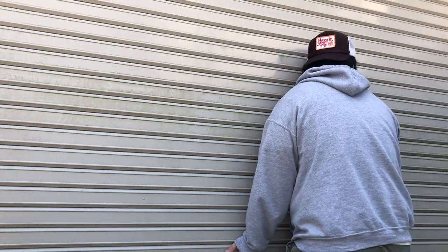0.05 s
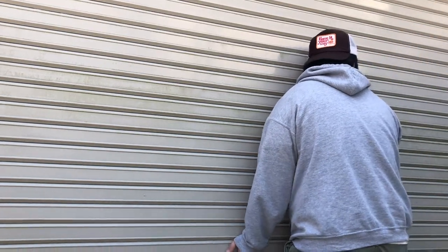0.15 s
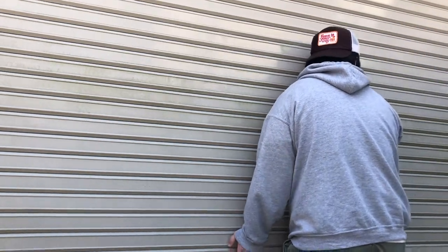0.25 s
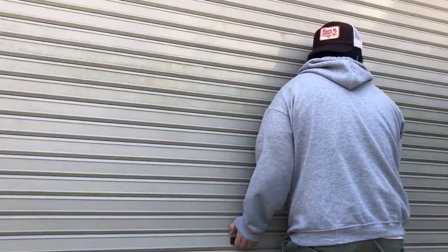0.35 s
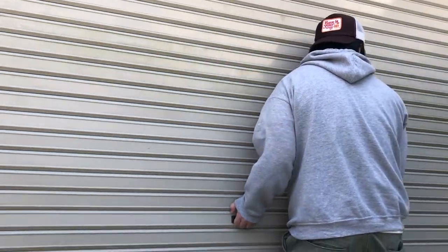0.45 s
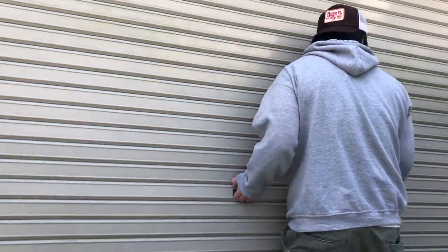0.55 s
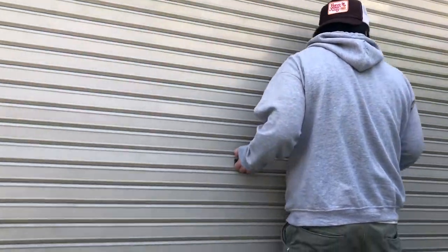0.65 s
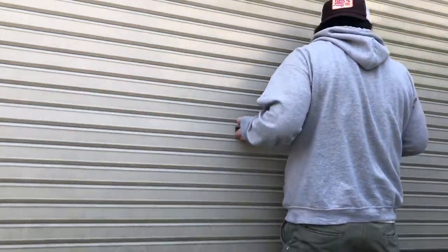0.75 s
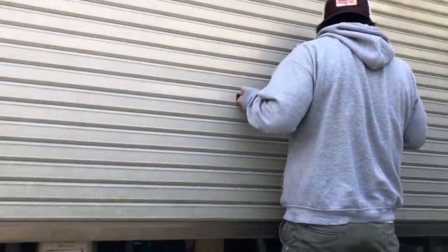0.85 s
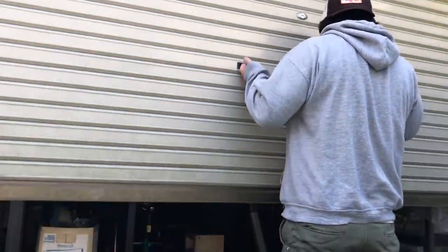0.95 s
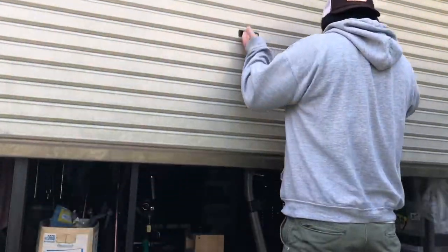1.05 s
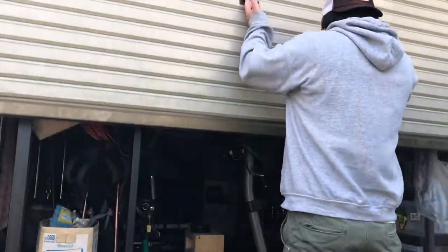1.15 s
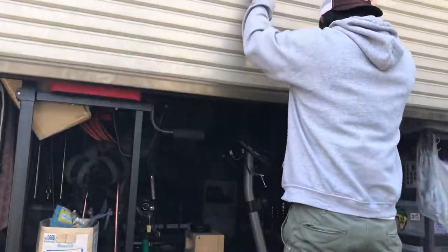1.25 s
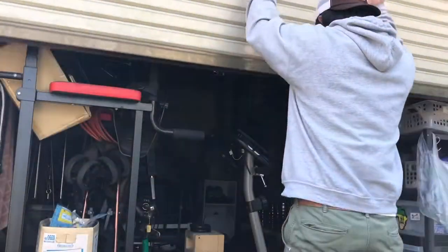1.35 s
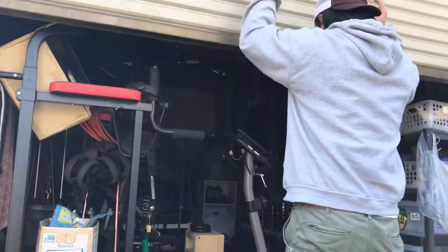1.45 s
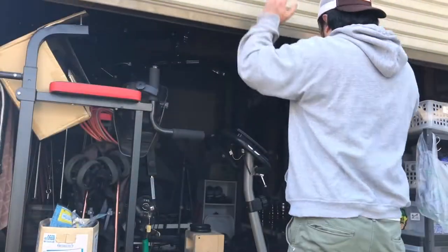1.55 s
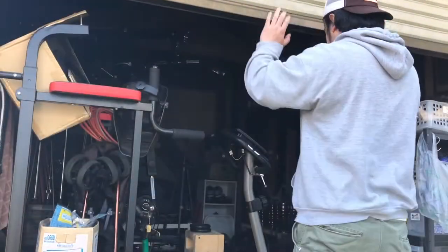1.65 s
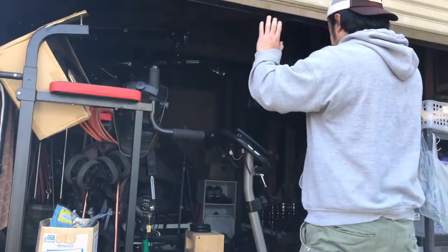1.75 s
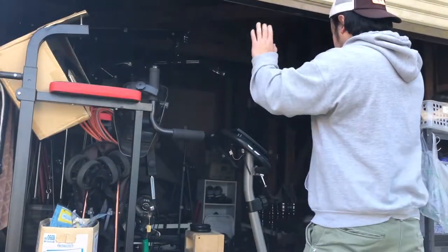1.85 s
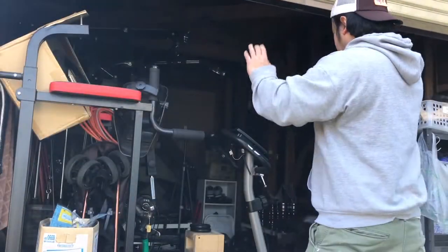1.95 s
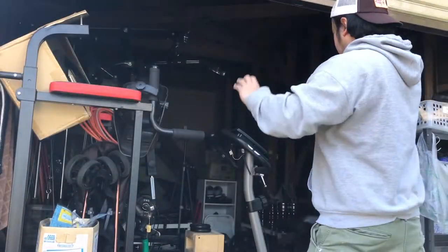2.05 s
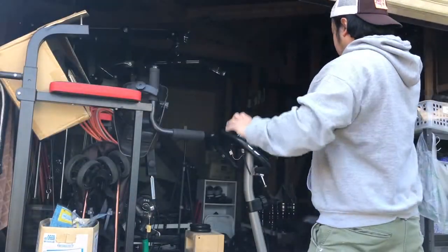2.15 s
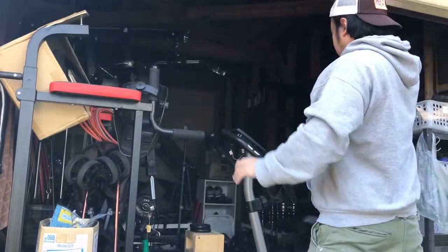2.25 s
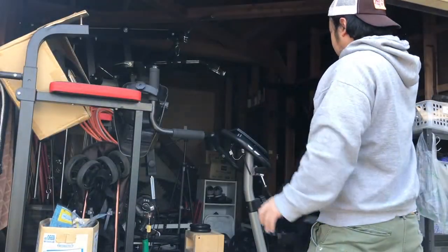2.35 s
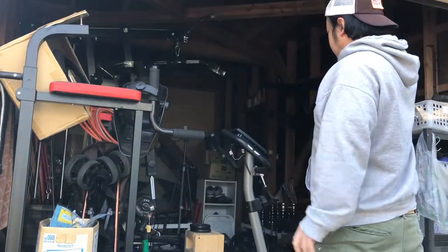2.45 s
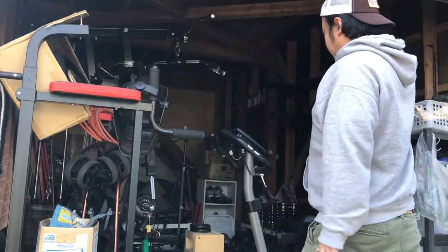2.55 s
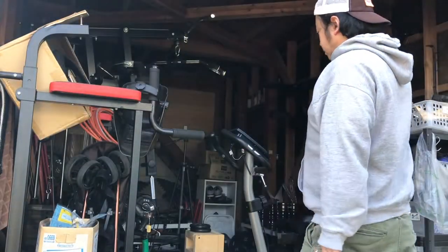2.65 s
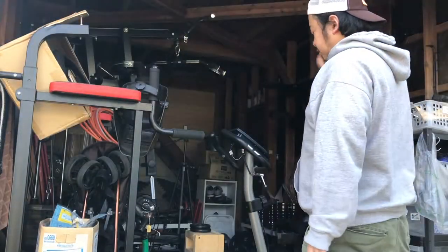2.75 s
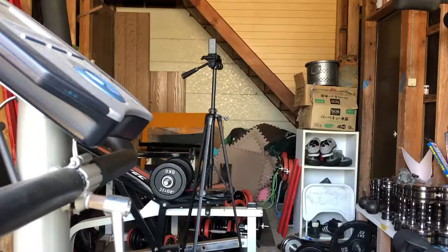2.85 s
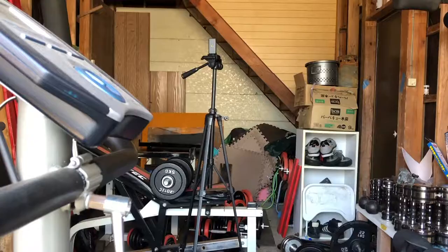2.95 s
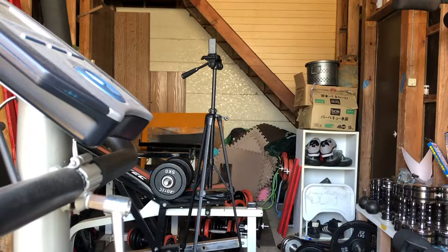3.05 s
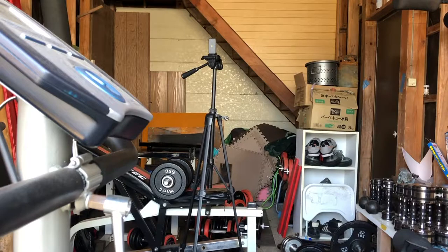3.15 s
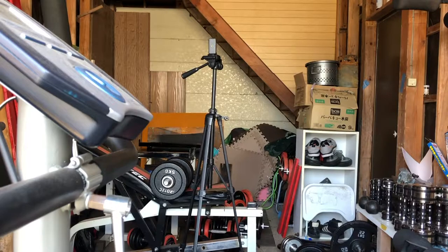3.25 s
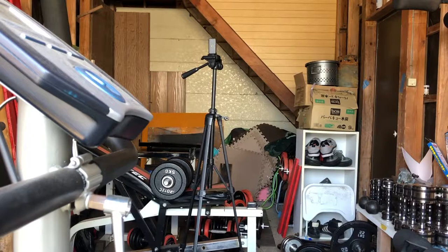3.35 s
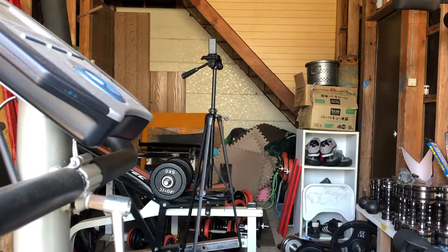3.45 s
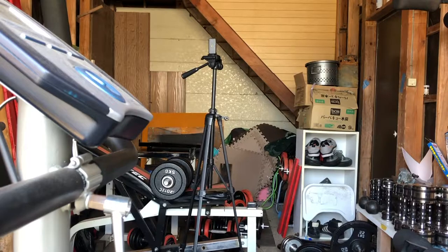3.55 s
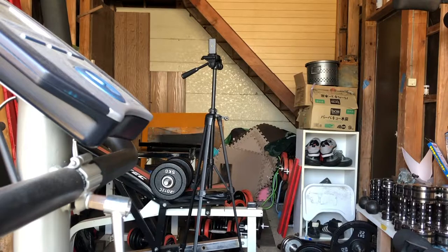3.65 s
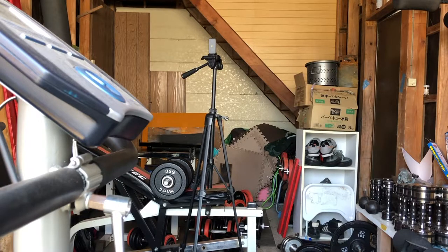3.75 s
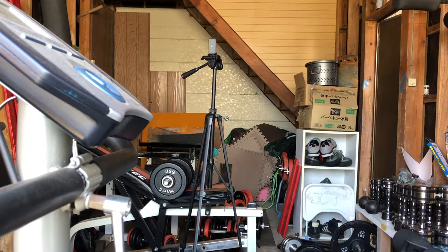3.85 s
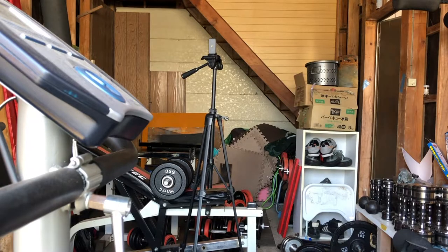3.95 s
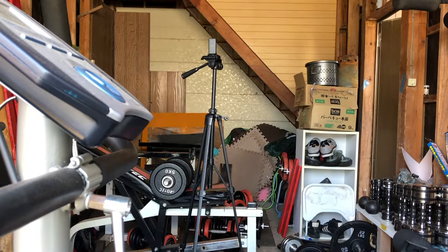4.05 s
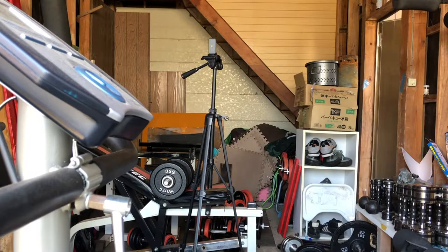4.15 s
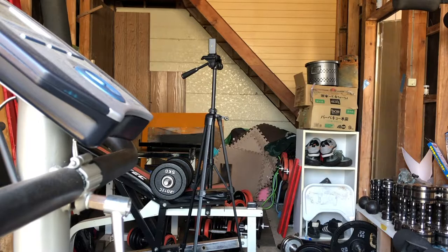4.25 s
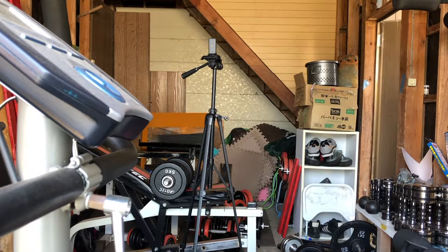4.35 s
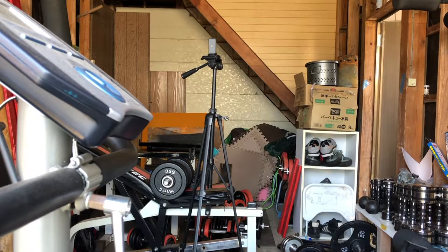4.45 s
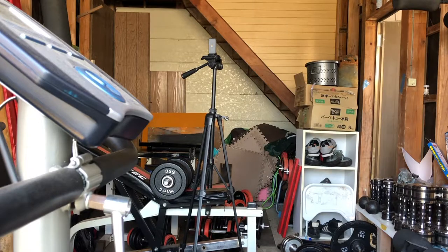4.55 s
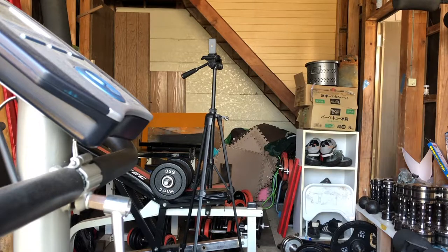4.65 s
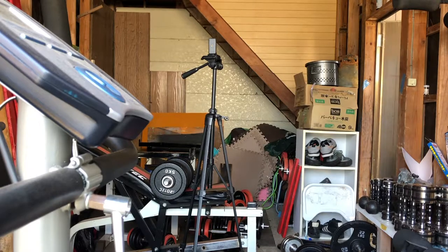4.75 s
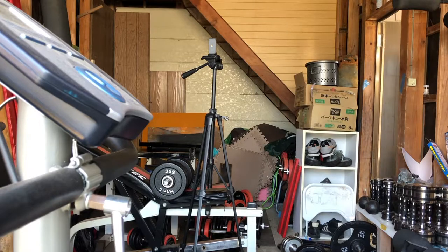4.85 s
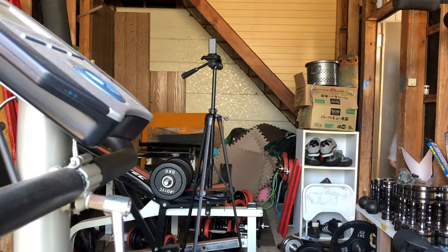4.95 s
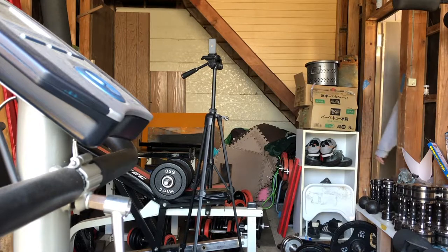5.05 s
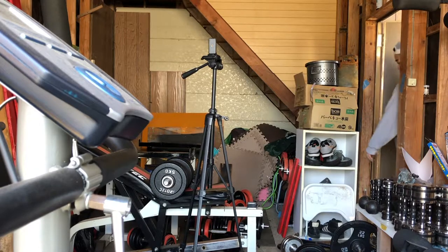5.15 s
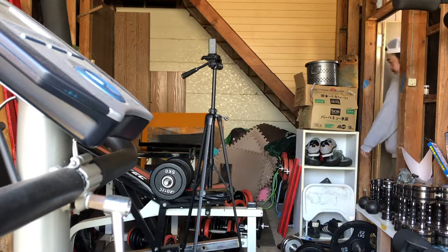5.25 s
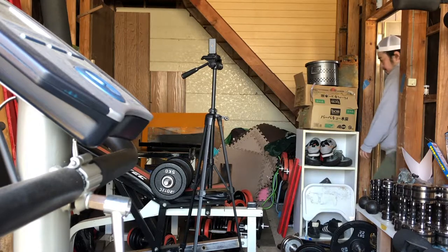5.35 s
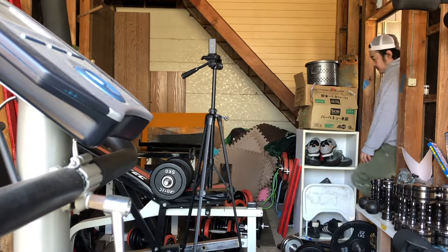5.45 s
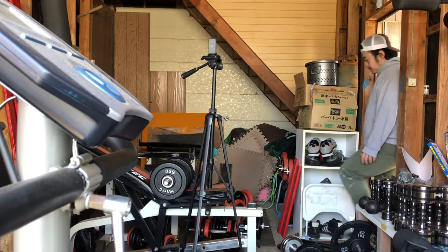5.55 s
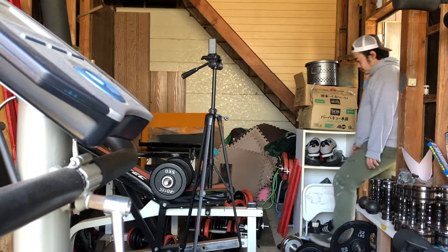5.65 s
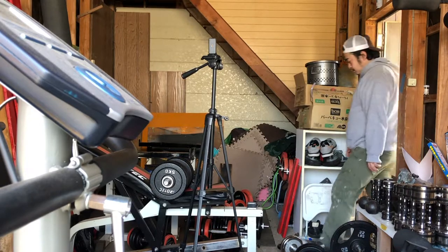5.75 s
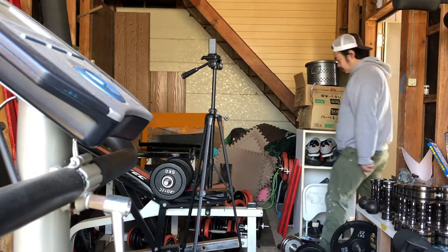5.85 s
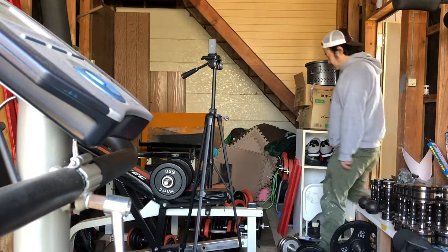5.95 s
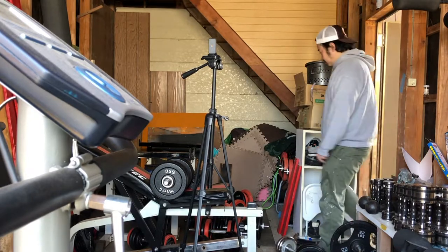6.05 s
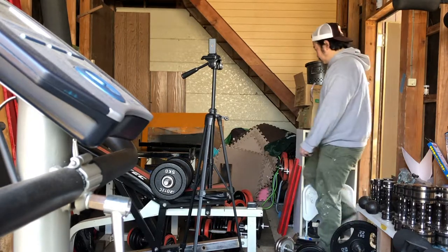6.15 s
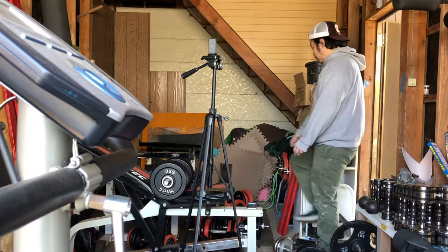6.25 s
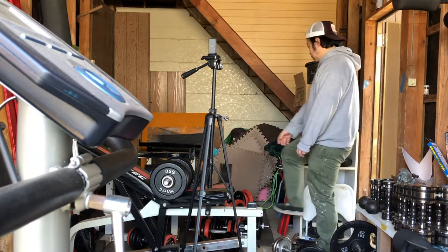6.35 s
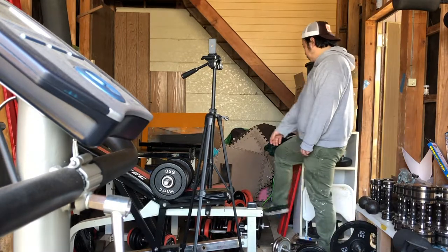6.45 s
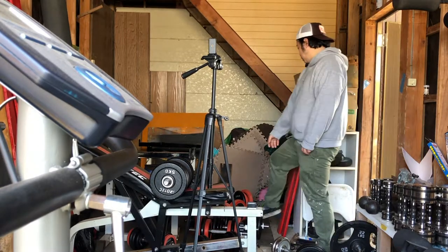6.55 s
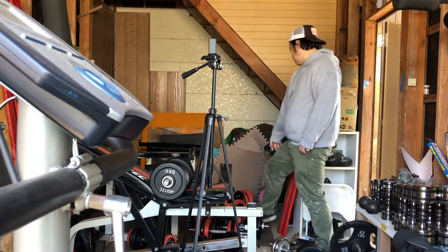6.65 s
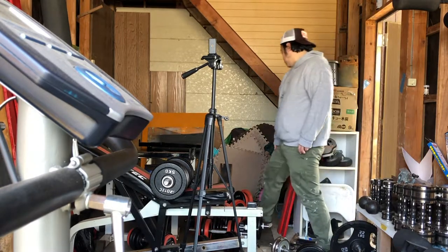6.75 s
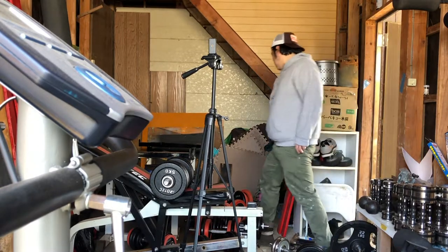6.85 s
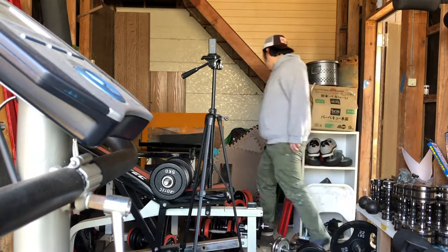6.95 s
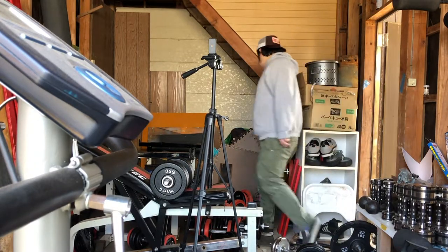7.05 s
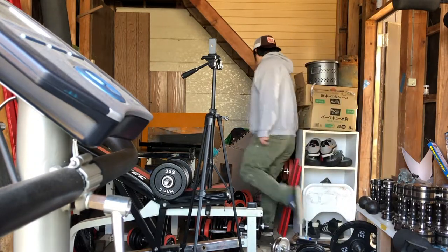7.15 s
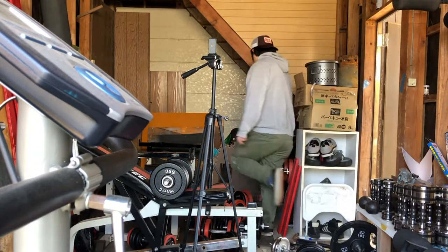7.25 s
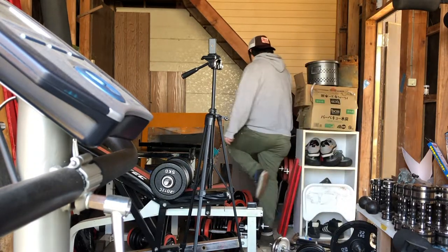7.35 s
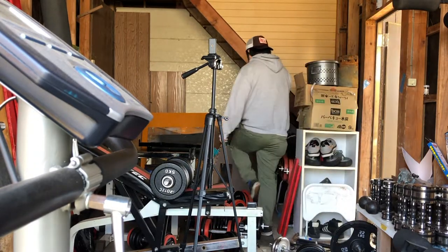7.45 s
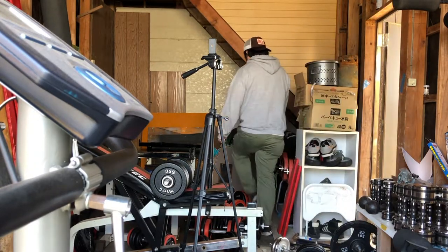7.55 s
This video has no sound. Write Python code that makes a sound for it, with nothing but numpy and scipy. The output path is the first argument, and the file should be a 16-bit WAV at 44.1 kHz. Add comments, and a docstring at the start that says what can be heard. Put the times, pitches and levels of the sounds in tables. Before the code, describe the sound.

A loud, harsh metallic rattle surges as a roller shutter goes up by hand, its slats banging in the rails right before a phone-like microphone. Suddenly everything is quiet inside a small garage. A sliding door hums along its track twice, with wooden creaks and latch ticks; a hoarse bird slides downward in pitch outside. Someone steps in, knocking and clinking iron weights, shoes scuff, and low thumps finish close by.

```python
"""Outside, close in front: a steel roller shutter is thrown up by hand. Its slats clatter in their rails and
slam as bursts of decaying noise and modes, the curtain booms, and gliding tones squeal.
Then the place changes abruptly to inside the garage, with quiet air, a low hum, knocks, ticks and steps.
A bird slides down in pitch outside, a door rolls open and shut on humming rollers, and wood creaks.
A man steps in over clinking iron weights, rung as beating modes, and soft sagging tones bump close by."""
import sys
import numpy as np
from scipy import signal
from scipy.fft import rfft, irfft, next_fast_len
from scipy.io import wavfile
from scipy.ndimage import uniform_filter1d

SR = 44100
rng = np.random.default_rng(int(sys.argv[2]) if len(sys.argv) > 2 else 0)


def inscribe(sig):
    """Save sig as 16-bit PCM at rate SR to the path in sys.argv[1].

    A 1-D sig is mono; a 2-D sig holds one channel per row.
    Samples are clipped to [-1, 1] before scaling.
    """
    pcm = np.round(np.clip(np.atleast_2d(sig).T, -1, 1) * 32767)
    wavfile.write(sys.argv[1], SR, pcm.astype(np.int16))


N = 335553
T = np.arange(N) / SR
CUT_S = 2.852  # from outside to inside

# All dB columns are relative levels, trimmed where they are used.
# slats slamming against rail and drum: start_s, body_db, edge_db, tick_db, resonance_hz
SLAMS = [(0.14, -15, -29, -21, 880), (0.303, -5.5, -18.5, -20, 1310), (0.407, -12, -17, -14, 860),
         (0.487, -17, -16, -16, 1070), (0.553, -16, -15, -15, 1440), (0.605, -11, -17, -32, 1040),
         (0.656, -6, -14, -32, 1010), (0.717, -17, -15.5, -27, 991), (0.769, -8.5, -14, -15, 920),
         (0.82, -12, -21.5, -41, 1220), (0.871, -3.5, -21, -39, 705), (0.9, -12, -16, -33, 1110),
         (0.95, -5.5, -24, -26, 1570), (0.979, -17, -17.5, -27, 1030), (1.153, -3, -14, -24, 750),
         (1.254, -4, -28, -30, 1000), (1.302, -6, -18, -20, 980), (1.351, -7.5, -19.5, -28, 910),
         (1.383, -5.5, -30, -36, 760), (1.49, -8, -28, -37, 990), (1.502, -6.5, -17, -26, 815),
         (1.694, -9, -29.5, -38, 1260), (1.748, -9, -33, -21, 1020), (1.878, -9.5, -26.5, -35, 1010),
         (1.945, -8.5, -18.5, -19, 1110), (2.116, -19, -41, -20, 1220), (2.175, -17, -26, -16.5, 736),
         (2.212, -14, -25, -32, 595), (2.33, -13, -22, -30, 1280), (2.385, -10.5, -30, -36, 587),
         (2.491, -14, -48, -39, 1020), (2.528, -11.5, -39, -25, 620), (2.652, -11, -21.5, -44, 1130),
         (2.704, -11.5, -23, -31, 895), (2.843, -13, -36, -30, 1130)]
# outline of a small metallic tick: frequency_hz, level_db
TICK_OUTLINE = [(3000, -9.5), (6000, 4.5), (11000, -1.5), (13000, -5), (16000, -12.5)]


def undb(db):
    """Decibels to gain."""
    return 10 ** (np.asarray(db) / 20)


def unit(x):
    """Scale to rms 1."""
    return x / np.sqrt(np.mean(x ** 2) + 1e-20)


def curve(rows):
    """Every column of a table, joined by straight lines in time."""
    s, *columns = np.transpose(rows)
    return [np.interp(T, s, c) for c in columns]


def add(out, s, x):
    """Mix x into out from time s on."""
    i = max(int(s * SR), 0)
    out[i:i + len(x)] += x[:max(N - i, 0)]


def colour(x, points):
    """Causal filter with the given (Hz, dB) outline and unit power gain."""
    size = 2 * next_fast_len(len(x) // 2 + 2048)
    hz, db = np.transpose(points)
    f = np.log(np.maximum(np.fft.rfftfreq(size, 1 / SR), 1))
    # beyond the outline the gain falls steeply
    outside = np.maximum(np.log(hz[0]) - f, 0) + np.maximum(f - np.log(hz[-1]), 0)
    gain = unit(undb(np.interp(f, np.log(hz), db) - 40 * outside))
    # folding the cepstrum forward gives minimum phase
    cepstrum = irfft(np.log(gain + 1e-6))
    cepstrum[1:size // 2] *= 2
    cepstrum[size // 2 + 1:] = 0
    response = np.exp(rfft(cepstrum))
    return irfft(rfft(x, size) * response, size)[:len(x)]


def favour(f, hz, octaves):
    """A soft bump around hz on the octave scale, height 1."""
    return 1 / (1 + (np.log2(f / hz) / octaves) ** 2)


def peaked(points, hz, lift_db):
    """An outline with one resonance raised."""
    centres, db = np.transpose(points)
    f = np.geomspace(centres[0], centres[-1], 120)
    base_db = np.interp(np.log(f), np.log(centres), db)
    return np.transpose([f, base_db + lift_db * favour(f, hz, octaves=0.22)])


def fade(t, t60):
    """Free decay, 60 dB down after t60."""
    return np.exp(-np.log(1000) * t / t60)


def burst(t60, tail_db, tail_t60):
    """Countless close modes struck at once: a quick crack over a longer ring."""
    t = T[:SR // 2]
    return rng.standard_normal(len(t)) * (fade(t, t60) + undb(tail_db) * fade(t, tail_t60))


def walk(rate):
    """Smooth chance with a spread near 1."""
    k = max(int(SR / rate), 2)
    steps = np.repeat(rng.standard_normal(N // k + 1), k)
    return unit(uniform_filter1d(uniform_filter1d(steps, k), k))[:N]


def swell(length):
    """A contact that builds quickly and lets go slowly."""
    u = np.linspace(0, 1, max(int(length * SR), 8))
    return np.sin(np.pi * u ** 0.53) ** 2


def slat_ring(t60=0.14, count=40):
    """Scattered bending modes of one steel slat; rms 1 at the strike."""
    t = T[:SR // 5]
    place, phase, life = rng.random((3, count, 1))
    hz = 700 * 14 ** place
    modes = np.sin(2 * np.pi * (hz * t + phase)) * fade(t, t60 * (.5 + life))
    return np.sum(modes, axis=0) * np.sqrt(2 / count)


def clatter(rate, spread_db, t60, tail_db, tail_t60, ring_db=-60, count=8):
    """Random impacts shared among several loose parts, each with its own ring; rms near 1."""
    out = 0
    for _ in range(count):
        struck = rng.random(N) < rate / count / SR
        hits = struck * undb(spread_db * np.clip(rng.standard_normal(N), -2, 1.5))
        part = burst(t60, tail_db, tail_t60)
        ring = slat_ring(count=16)
        part[:len(ring)] += undb(ring_db) * ring
        out = out + signal.oaconvolve(hits, part)[:N]
    # steady power, however it is shared among the impacts
    return out / np.sqrt(uniform_filter1d(out ** 2, SR // 16) + 1e-9)


def room(x, t60, wet_db):
    """Direct sound plus duller diffuse reflections, first arriving after 5 ms."""
    t = T[:SR]
    noise = rng.standard_normal(SR) * fade(t, t60) * (t > .005)
    tail = colour(noise, [(40, 4), (4000, -13.0), (16000, -13)])
    return x + undb(wet_db) * signal.oaconvolve(x, unit(tail) / np.sqrt(SR))[:N]


def binding(depth_db=1.0, hold=0.069):
    """The curtain catches and goes quieter just before each slat breaks loose."""
    until = np.array(SLAMS)[:, :1] - T[None, :int(CUT_S * SR)]
    caught = np.max((until > 0) * np.exp(-np.abs(until) / hold), axis=0)
    return undb(-depth_db * np.pad(caught, (0, N - len(caught))))


def shutter():
    """Hinged slats chatter, the sheet booms with speed, the edges grind in the rails, and single slats slam."""
    # travel of the curtain, thrown up, nearly stopping, then driven up again: time_s, speed_m_per_s
    lift = [(0, 0.6), (.3, 0.15), (.7, 0.27), (.93, 1.37), (1.38, 1.08), (1.6, 1.25), (2.0, 0.1),
            (2.35, 0.8), (2.85, 0.97)]
    # how hard the slats shake, surging as the drum turns: time_s, level_db
    shake = [(0, -33), (.07, -20), (.2, -28.5), (.45, -21.5), (.66, -16.5), (.83, -24), (.95, -17.5),
             (1.2, -19.5), (1.39, -15.5), (1.46, -23), (1.62, -23.5), (1.76, -19.5), (1.85, -28),
             (1.99, -18.5), (2.08, -28.5), (2.24, -22), (2.38, -20), (2.46, -32.5), (2.54, -22),
             (2.62, -26.5), (2.72, -19.5), (2.79, -26), (2.85, -21.5)]
    # outlines of curtain boom, slat rattle, rail scrape and slam edge: frequency_hz, level_db
    boom_outline = [(35, -12.5), (52, -0.5), (80, -4), (105, -3.5), (150, 3.5), (185, -0.5), (230, -3),
                    (320, -3.5), (400, -17), (520, -5.5), (620, -18)]
    rattle_outline = [(240, -11), (400, 3.5), (530, -9.5), (607, 3), (741, -5.5), (1000, -2), (1100, -3),
                      (1150, -2.5), (1230, -3.5), (1370, -4.5), (1650, -9), (2260, -10), (3500, -25),
                      (4550, -39), (7700, -120)]
    scrape_outline = [(1470, -22.5), (2500, 1.5), (2940, -2), (5390, -1.5), (9080, -9.5), (10100, -10),
                      (11700, -15.5), (13000, -18.5), (15200, -20), (16000, -32)]
    edge_outline = [(900, -29), (2000, 1), (4500, 1), (8000, -3.5), (11000, -9), (16000, -28.5)]
    ring_outline = [(600, -6.5), (1550, 5.5), (3000, -10.5), (10000, -11)]

    speed, = curve(lift)
    shake_db, = curve(shake)
    height = np.cumsum(speed) / SR  # metres
    flap_db = 5.5 * speed  # dB per m/s: a fast curtain flaps as a whole sheet
    thinning_db = -3.5 * height  # dB per metre: less edge is left in the rails as it rises

    rattle = clatter(rate=300, spread_db=2, t60=0.032, tail_db=-11.5, tail_t60=0.3055, ring_db=-4, count=20)
    boom = clatter(rate=200, spread_db=1.5, t60=0.0712, tail_db=-7.5, tail_t60=0.24)
    scrape = clatter(rate=340, spread_db=4.5, t60=0.01258, tail_db=-1.5, tail_t60=0.3252, ring_db=-5.0)
    # levels against the rattle, with the curtain at rest and down
    out = unit(colour(rattle, rattle_outline))
    out += undb(-8 + flap_db) * unit(colour(boom, boom_outline))
    out += undb(-4.5 + thinning_db) * unit(colour(scrape, scrape_outline))
    out *= undb(shake_db) * binding()

    for s, body_db, edge_db, tick_db, hz in SLAMS:
        low_db = body_db + flap_db[int(s * SR)]
        tick = colour(burst(t60=0.014, tail_db=-22, tail_t60=0.13), TICK_OUTLINE)
        edge = colour(burst(t60=0.085, tail_db=-9, tail_t60=0.3), edge_outline)
        body_outline = peaked(rattle_outline, hz, lift_db=11.5)
        body = colour(burst(t60=0.16, tail_db=-14.5, tail_t60=0.38), body_outline)
        ring = colour(slat_ring(t60=0.19, count=24), ring_outline)
        slam_boom = colour(burst(t60=0.24, tail_db=-14.5, tail_t60=0.39), boom_outline)
        add(out, s, undb(tick_db - 3) * tick)
        add(out, s, undb(edge_db - 1.5) * edge)
        add(out, s, undb(body_db - 12) * body)
        add(out, s, undb(body_db - 19) * ring)
        add(out, s, undb(low_db - 21) * slam_boom)

    # the deepest boom fades as the free sheet winds onto the drum, gone at 2.3 m
    deep = signal.sosfiltfilt(signal.butter(2, 112, fs=SR, output="sos"), out)
    return out - np.clip(height / 2.3, 0, 1) ** 2 * deep


def squeals(waver=0.006):
    """Dry steel sings for a moment on an unsteady pitch, gripping unevenly."""
    # steel sticking and slipping: start_s, length_s, pitch_hz, glide_share, level_db
    slips = [(.099, .0085, 12300, -0.12, -13.5), (.1, .014, 4700, -0.075, -18),
             (1.827, .0075, 9340, -.03, -30.5), (1.96, .145, 1163, -.004, -15),
             (2.341, 0.025, 11570, -0.077, -23), (2.829, .047, 1129, -0.024, -23.5),
             (2.83, .046, 900, -.015, -25)]
    out, wobble, grip = np.zeros(N), walk(700), undb(2 * walk(150))
    for s, length, hz, glide, db in slips:
        push = swell(length)
        now = int(s * SR) + np.arange(len(push))
        pitch = hz * (1 + glide * np.linspace(0, 1, len(push)) + waver * wobble[now])
        phase = 2 * np.pi * np.cumsum(pitch) / SR
        octave = (4 * hz < SR) * np.sin(2 * phase)  # left out where it would alias
        add(out, s, undb(db + 4) * push * grip[now] * (np.sin(phase) + undb(-20) * octave))
    return room(out, t60=0.21, wet_db=-11.5)


def background():
    """Quiet air and a low hum drift in level under a faint thin whine of narrow noise."""
    # outline of the air: frequency_hz, level_db
    air_outline = [(15, -28), (25, -18), (42, -11.5), (64, -7.5), (78, -8.5), (97, -13.5), (229, -22),
                   (263, -25.5), (641, -29), (1160, -28.5), (2910, -38), (6920, -44), (10400, -49),
                   (14800, -53), (16000, -57)]
    air = undb(-45 + 0.84 * walk(5)) * unit(colour(rng.standard_normal(N), air_outline))
    hum = undb(-54.5 + 2 * walk(5.13)) * np.sin(2 * np.pi * 59.5 * T)
    whine = undb(-68.5) * colour(rng.standard_normal(N), [(7800, -43.0), (8650, -13), (9500, -29.0)])
    return air + hum + whine


def knocks_and_steps():
    """Each knock is a tap over a thud; the latch ticks; soles and cloth brush in between."""
    # small ticks of latch and runners: start_s, level_db
    latch = [(2.925, -41.5), (3.029, -39), (3.48, -71), (3.67, -21.5), (3.801, -25), (4.262, -36),
             (4.587, -31), (4.703, -36.5), (5.465, -34), (6.455, -42.5)]
    # soles and trousers brushing: start_s, length_s, level_db
    scuffs = [(3.054, 0.43, -48), (5.13, 0.1954, -72), (5.787, 0.82, -52), (6.063, 0.052, -60),
              (6.288, 0.6, -50), (6.83, 0.37, -50), (7.003, 0.13, -39.5), (7.331, 0.14, -38),
              (7.402, 0.19, -43.5)]
    # knocks of door and shoes, and at 6.116 s the dull low body of a clinking iron weight: start_s, tap_db,
    # thud_db, resonance_hz
    knocks = [(3.358, -32, -30, 1217), (3.468, -28, -34, 1180), (3.662, -16.5, -41, 634),
              (4.284, -36.5, -26, 402), (4.349, -50.5, -33, 428), (4.389, -62, -41, 330),
              (4.586, -25.5, -22, 1129), (5.143, -30.5, -29, 900), (5.465, -35.5, -62, 1629),
              (5.741, -29.5, -24.5, 580), (5.835, -26, -22, 1630), (5.894, -17, -18.5, 1300),
              (6.095, -20, -28.5, 720), (6.116, -32, -34, 636), (6.564, -37, -42, 1800),
              (6.79, -25.5, -30.5, 606), (6.805, -27, -42, 1340)]
    # outlines of tap, thud and brushing: frequency_hz, level_db
    tap_outline = [(350, -15.5), (600, 1.5), (1300, 0.5), (2500, -3), (5000, -9), (10000, -24.5),
                   (16000, -40)]
    thud_outline = [(60, -46), (150, 1.5), (300, -1.5), (500, -5), (900, -18)]
    scuff_outline = [(150, 4), (400, -10), (900, -6), (1800, -12.5), (4000, -15), (9000, -21.5),
                     (16000, -37)]

    out = np.zeros(N)
    for s, tap_db, thud_db, hz in knocks:
        tap = colour(burst(t60=0.31, tail_db=-1.0, tail_t60=0.54), peaked(tap_outline, hz, lift_db=11.0))
        thud = colour(burst(t60=0.29, tail_db=2, tail_t60=0.88), thud_outline)
        add(out, s, undb(tap_db - 14.0) * tap)
        add(out, s, undb(thud_db - 16.5) * thud)
    for s, db in latch:
        tick = colour(burst(t60=0.017, tail_db=-4, tail_t60=0.44), TICK_OUTLINE)
        add(out, s, undb(db - 11.5) * tick)
    grit = clatter(rate=390, spread_db=4.0, t60=0.00894, tail_db=21, tail_t60=0.086, count=4)
    grit = unit(colour(grit, scuff_outline))
    for s, length, db in scuffs:
        push = swell(length)
        add(out, s, undb(db) * push * grit[int(s * SR):][:len(push)])
    return out


def bird(length=.085, fall=0.39):
    """A hoarse two-voiced call slides down and echoes between the houses."""
    # falling calls outside: start_s, start_pitch_hz, level_db
    calls = [(3.325, 5290, -43.5), (4.127, 5280, -43.5), (5.095, 5540, -43.5), (6.048, 5720, -51),
             (6.854, 5327, -42.5), (7.313, 4600, -48)]
    out, rasp, push = np.zeros(N), walk(1400), swell(length) ** .5
    slide = fall * np.linspace(0, 1, len(push)) ** 1.1
    for s, hz, db in calls:
        pitch = hz * (1 - slide + 0.062 * rasp[int(s * SR):][:len(push)])
        phase = 2 * np.pi * np.cumsum(pitch) / SR
        add(out, s, undb(db - 2) * push * (np.sin(phase) + 0.8 * np.sin(.8 * phase)))
    return room(out, t60=0.5327, wet_db=6.0)


def sliding_door():
    """Shoved, the door coasts: rollers tick on the track and hum at speed; the hollow leaf rumbles."""
    # shoved open, then shut: start_s, fastest_s, stop_s, rumble_db, track_db, roller_hz, slowing_db_per_s
    slides = [(3.53, 3.695, 4.44, -19.5, -25, 372, 38), (4.578, 4.662, 5.09, -22, -34, 308.7, 55)]
    # outlines of door panel, hollow leaf and track: frequency_hz, level_db
    panel_outline = [(29, -58), (50, 1.5), (92, -7.5), (146, 8), (210, 1), (299, 0), (330, -6), (361, -12),
                     (460, -21), (620, -21.5), (700, -17), (910, -62), (1540, -120)]
    hollow_outline = [(240, -27.5), (284, -20), (298, -0.5), (314, -14.5), (335, -12), (354, -8), (367, -5),
                      (382, -23.5), (410, -10), (450, -33)]
    track_outline = [(260, -19.5), (450, 2), (572, -1.5), (625, -0.5), (993, -4.5), (1140, -1.5),
                     (1950, -8.5), (3330, -12), (3810, -13.5), (4300, -14), (12000, -36), (16000, -43.5)]

    panel = clatter(rate=200, spread_db=-1.0, t60=0.17, tail_db=-1.0, tail_t60=0.27)
    panel = unit(colour(panel, panel_outline))
    hollow = unit(colour(rng.standard_normal(N), hollow_outline))
    leaf = undb(-2) * panel + undb(-5) * hollow
    track = clatter(rate=260, spread_db=3, t60=0.009, tail_db=0, tail_t60=0.28)
    track = unit(colour(track, track_outline))

    out, load, wobble = np.zeros(N), 1 + 0.17 * walk(60), 1 + 0.0264 * walk(120)
    for start, fastest, stop, rumble_db, track_db, hz, slowing_db in slides:
        # the rumble grows 135 dB/s while the hand pushes, then dies as the door slows
        speed_db = np.minimum(135 * (T - fastest), slowing_db * (fastest - T))
        pitch = hz * 2 ** (.015 * speed_db) * wobble  # octaves per dB of speed
        hum = load * np.sin(2 * np.pi * np.cumsum(pitch) / SR)
        rolling = uniform_filter1d(1. * ((T > start) & (T < stop)), SR // 40)
        out += rolling * undb(rumble_db + speed_db) * leaf
        # the rollers sing only near full speed
        out += rolling * undb(rumble_db + 1 + 2.2 * speed_db) * hum
        # the track rattle dies faster than the rumble
        out += rolling * undb(track_db + 1.09 * speed_db) * track
    return out


def creaks():
    """Quick stick-slip pulses ring one narrow resonance of the wood."""
    # door frame and floor creaking: start_s, length_s, pitch_hz, level_db
    creak_rows = [(3.668, 0.16, 1240, -32.5), (3.673, 0.097, 3140, -30.5), (3.827, 0.18, 2150, -38),
                  (4.577, 0.025, 1190, -35), (4.582, 0.084, 4270, -43), (4.887, 0.11, 1730, -45.5)]
    out = np.zeros(N)
    for s, length, hz, db in creak_rows:
        push = swell(length)
        slips = rng.standard_normal(len(push)) ** 3  # cubing leaves mostly sparse spikes
        resonance = [(hz / 2, -40), (0.67 * hz, -16), (hz, 0), (1.4 * hz, -16), (2 * hz, -35)]
        add(out, s, undb(db - 0.5) * push * unit(colour(slips, resonance)))
    return room(out, t60=0.23, wet_db=-3)


def iron_ring(modes, contact_hz, detune=0.0038, count=3):
    """A blow on cast iron: modes split into close beating lines, favoured near the contact's pitch."""
    t = T[:SR // 2]
    hz, db, t60 = np.transpose(modes)[:, :, None]
    envelope = undb(db) * favour(hz, contact_hz, octaves=0.59) * fade(t, t60)
    shift, phase = rng.standard_normal((2, count, len(modes), 1))
    lines = np.sin(2 * np.pi * (hz * (1 + detune * shift) * t + phase))
    return np.sum(envelope * lines, axis=(0, 1)) / np.sqrt(count)


def weights():
    """Iron plates clink and bounce on their bar."""
    # plates knocking together: start_s, plate_db, bar_db, contact_pitch_hz
    clinks = [(5.744, -43, -60.5, 2400), (5.836, -32, -20, 3395), (5.851, -20.5, -48.5, 2184),
              (5.895, -24, -38, 2494), (5.919, -8, -18.5, 4970), (5.936, -7, -45, 8200),
              (6.044, -24.5, -24.5, 3170), (6.095, -17, -47, 2900), (6.116, -19, -25, 3970),
              (6.13, -21, -52, 5100), (6.158, -26, -60, 5760), (6.566, -45, -45, 2540)]
    # ringing modes of the plates and of their bar: frequency_hz, level_db, t60_s
    plate_modes = [(2535, -2, 0.36), (2573, -3, 0.36), (2625, 4.5, 0.27), (2732, -10, 0.37),
                   (3978, -4, 0.071), (4250.5, -2, 0.12), (6029, -8, 0.25), (6300, -10, 0.25),
                   (7120, -14.5, 0.11), (7730, -17, 0.22), (9550, -30, 0.156), (10327, -19, 0.15),
                   (10780, -17, 0.16), (15300, -21, 0.1179)]
    bar_modes = [(648.5, 23.5, 0.37), (740, 19, 0.26), (1527, 10, 0.14), (1750.9, 7, 0.16),
                 (3324, -2, 0.1377), (3540, -16, 0.1404), (4258, -0.5, 0.3), (5300, -5, 0.16)]
    out = np.zeros(N)
    for s, plate_db, bar_db, hz in clinks:
        # a sharper contact carries the crack further into the treble
        crack_outline = [(600, -14), (hz, 0), (1.5 * hz, -10), (16000, -40)]
        crack = colour(burst(t60=0.00722, tail_db=-36.5, tail_t60=.12), crack_outline)
        plate = iron_ring(plate_modes, hz, detune=0.0032, count=4)
        add(out, s, undb(plate_db - 4.5) * (plate + undb(-17) * crack))
        add(out, s, undb(bar_db - 8.5) * iron_ring(bar_modes, hz))
    return room(out, t60=0.33, wet_db=-11.5)


def bumps(t60=0.03, sag=0.3127):
    """Dull, dry bumps whose pitch sags as they die."""
    # soft low bumps close by: start_s, pitch_hz, level_db
    bump_rows = [(7.11, 131, -24), (7.128, 238, -16), (7.133, 127, -20), (7.167, 130, -33),
                 (7.176, 222, -23.5), (7.185, 130.1, -27)]
    out, t = np.zeros(N), T[:SR // 8]
    envelope = (1 - fade(t, 0.0056)) ** 2 * fade(t, t60)
    for s, hz, db in bump_rows:
        pitch = hz * (1 - sag * (1 - fade(t, 0.076)))
        phase = 2 * np.pi * np.cumsum(pitch) / SR
        add(out, s, undb(db + 5.5) * envelope * np.sin(phase))
    return out


def scene():
    """First in front of the shutter, then suddenly inside the garage."""
    outside = uniform_filter1d(1. * (T < CUT_S), 64)
    shutter_sound = shutter() + squeals()
    garage = background() + knocks_and_steps() + bird() + sliding_door() + creaks() + weights() + bumps()
    return (outside * shutter_sound + (1 - outside) * garage)[None]


def record(dry):
    """The phone's microphone drops the deepest bass, rounds the loudest peaks and cuts the top."""
    lean = signal.sosfilt(signal.butter(4, 36, "high", fs=SR, output="sos"), dry)
    rounded = 1.4 * np.tanh(lean / 1.4)
    return signal.sosfilt(signal.ellip(10, .2, 80, 16000, fs=SR, output="sos"), rounded)


dry = scene()
out = record(dry)
inscribe(out)
```